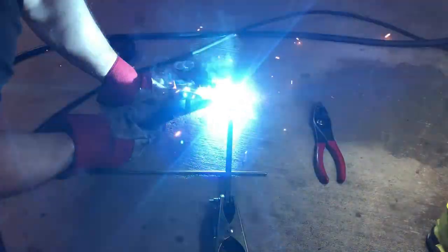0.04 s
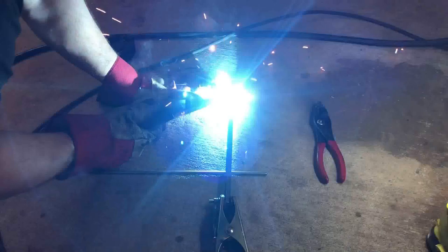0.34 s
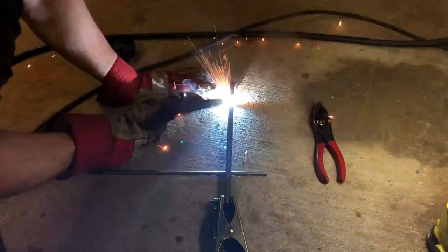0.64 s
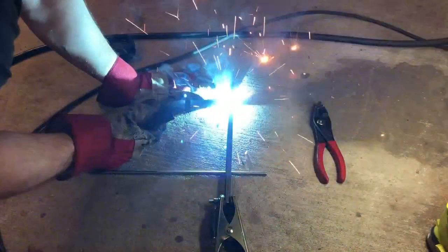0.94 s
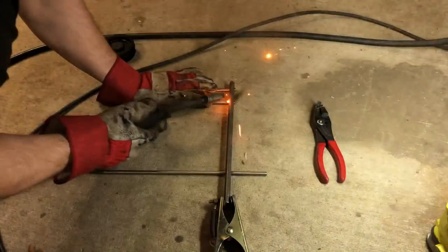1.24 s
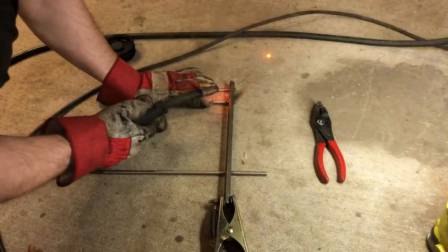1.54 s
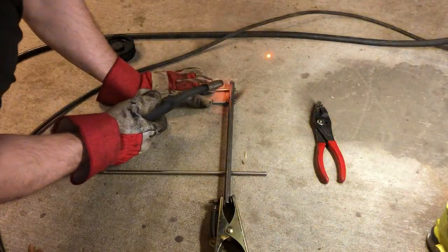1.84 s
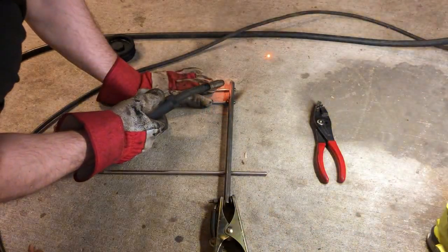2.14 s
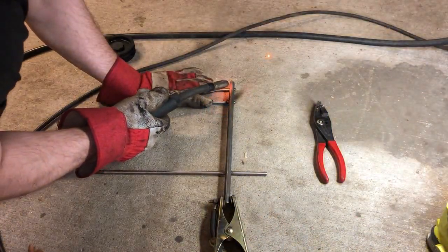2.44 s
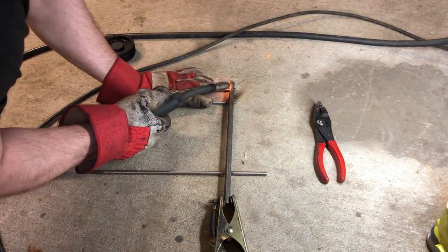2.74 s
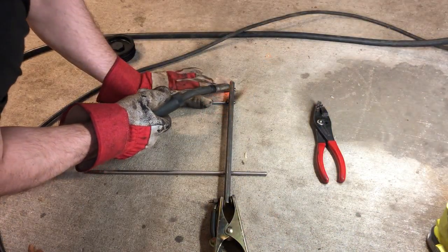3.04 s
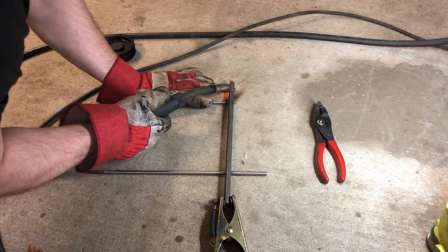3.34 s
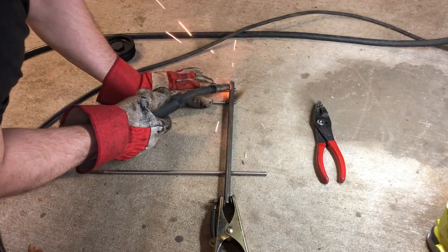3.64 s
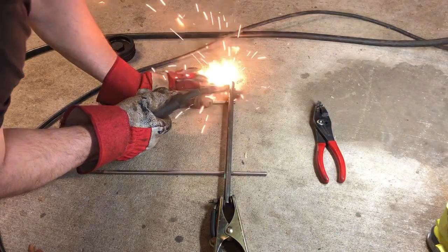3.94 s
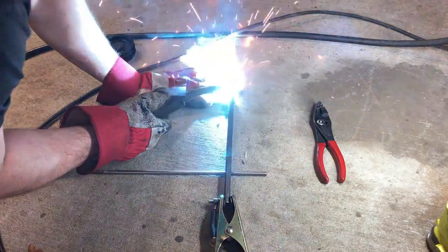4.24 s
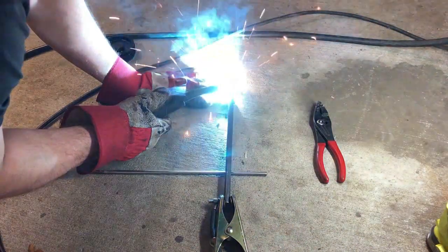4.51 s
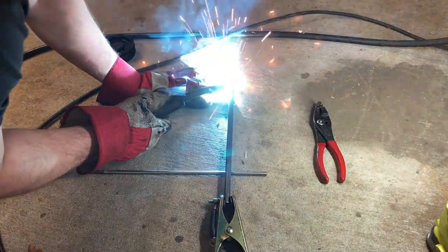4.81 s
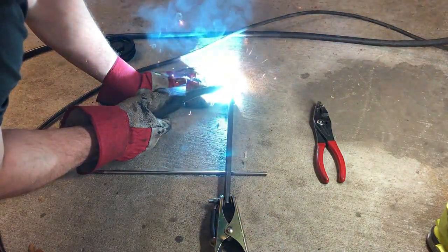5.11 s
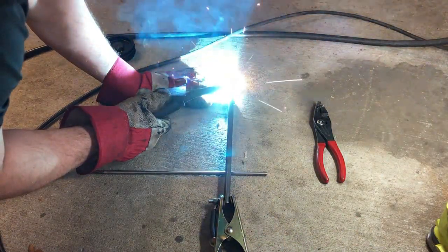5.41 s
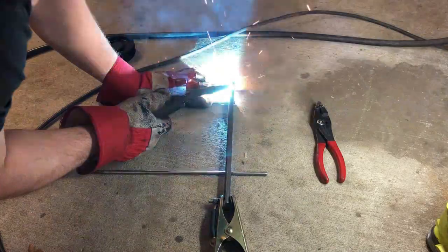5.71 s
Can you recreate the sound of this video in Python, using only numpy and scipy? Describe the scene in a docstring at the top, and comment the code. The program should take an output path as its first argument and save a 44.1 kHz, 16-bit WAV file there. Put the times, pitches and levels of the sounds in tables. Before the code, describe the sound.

A wire-feed arc welder is working on steel rods close to the microphone in a concrete-floored shop. From the start it gives sharp pops, quick crackling runs and fizzing sputter, each with a short room echo, stopping at about 1 second. Shielding gas hisses on softly with a slight high whistle until a valve shuts with a small knock at about 2.2 seconds. The welder's faint fan hum and thin electronic whine, present throughout, are left alone, with a very soft glove rub near 3 seconds. At 3.5 seconds the valve opens with a click and a puff, and the hiss returns. Scattered pops begin at 3.6 seconds, grow loud around 3.9, and from about 4.3 become a dense, uneven crackle lasting until nearly 6 seconds. The loudest pops slightly overload the microphone with a low thump.

```python
"""Sharp pops and sputter come first: a wire-feed arc welder tacks steel rods on a concrete shop floor.
Each time the wire touches the metal (a short) and the arc relights, it pops; floor and shop echo it.
Shielding gas hisses on after this first weld until its valve shuts. A glove rubs, then the valve
opens for a second, longer weld. The welder's fan hums and its electronics whine throughout.
The loudest pops overload the nearby microphone."""
import sys
import numpy as np
from scipy import signal
from scipy.fft import rfft, irfft, next_fast_len
from scipy.io import wavfile
from scipy.ndimage import map_coordinates

SR = 44100
rng = np.random.default_rng(int(sys.argv[2]) if len(sys.argv) > 2 else 0)


def generate_wav(sig):
    """Save sig (samples, or channels by samples) to the path in sys.argv[1] as 16-bit PCM at SR."""
    pcm = np.round(np.clip(np.atleast_2d(sig).T, -1, 1) * 32767).astype(np.int16)
    wavfile.write(sys.argv[1], SR, pcm)


N = 258646
LEAD = SR // 10  # extra samples before time zero, cut off at the end
TIME = np.arange(-LEAD, N) / SR
FFT_SIZE = next_fast_len(N + 2 * SR)
HZ = np.fft.rfftfreq(FFT_SIZE, 1 / SR)

# Lone pops where the wire stubs. Each row: time in seconds, thud and crack in relative dB.
SINGLE_POPS = [(-0.03, -9, -13.5), (0.4576, -6, -16.5), (0.7024, -13, -16), (3.6004, -13.5, -15.5),
               (3.6407, -18.5, -39), (3.7052, -26.5, -39), (3.8622, -12, -17), (3.9009, -7, -10),
               (4.0112, -6, -25.5), (4.031, -12.5, -11.5), (4.08, -21, -38), (4.188, -7.5, -23),
               (4.2124, -7, -9), (4.465, -14, -21), (4.7265, -15, -23), (4.7481, -8, -22),
               (4.7551, -10, -8.5), (4.7815, -11.5, -13), (4.8189, -8, -10.5), (4.8525, -13.5, -26),
               (5.2687, -10.5, -30), (5.3444, -10.5, -13), (5.4647, -11.5, -16), (5.5889, -14.5, -33)]
# Even runs of pops while the wire feeds steadily. Each row: first and last time in seconds,
# number of pops, thud and crack in relative dB, the thud's fall over the run in dB.
POP_RUNS = [(0.2068, 0.3092, 5, -9, -13, -2), (0.8381, 0.8786, 3, -6.5, -17, 1),
            (.892, 0.9441, 9, -11.5, -21, -1), (4.3278, 4.4258, 6, -8.5, -14, -1),
            (4.4825, 4.649, 10, -9.5, -16.5, 2), (4.8795, 5.0093, 5, -11.5, -16, -1.5),
            (5.044, 5.2425, 7, -14, -22.5, 0), (5.276, 5.5076, 8, -13.5, -22.5, 0),
            (5.634, 5.8423, 6, -12, -21, 6.5)]
# Ringing around the work. Each row: pitch in Hz, width in Hz, strength in dB.
RESONANCES = [(1054, 40, -2.5), (1296, 99, -3.5), (2297, 75, -4.5), (2404, 80, -12), (2730, 34, -18.5),
              (3160, 60, -5), (3427, 38, -4), (5300, 90, -22)]
# The wire burns back with no clean pop. Each row: start and length in seconds, level in dB.
SPITS = [(0.661, 0.018, -26.5), (0.679, 0.015, -18), (0.801, 0.029, -33.5), (0.891, 0.044, -24),
         (1.041, 0.023, -42.5), (3.993, 0.015, -20), (4.16, 0.012, -25), (4.313, 0.012, -26)]
# The gas jet as the torch moves. Each row: time in seconds, whistle in Hz, low rush in relative dB.
TORCH_PATH = [(1.15, 6000, -50), (1.266, 6150, -49), (1.48, 6020, -54.5), (1.59, 6050, -46),
              (1.96, 6070, -47), (2.2, 5800, -46.5)]
# The gas valve shuts, then opens. Each row: time in seconds, knock in dB, puff in dB.
VALVE_MOVES = [(2.185, -41.5, -61), (3.497, -42, -34.5)]
# Fan and transformer tones. Each row: pitch in Hz, level in dB.
HUM_TONES = [(269.2, -69), (473.7, -65), (538.3, -59.5), (882.9, -66), (1346, -59.5), (1615, -71),
             (1884, -76), (2153, -68)]
# Echoes off nearby surfaces. Each row: delay in seconds, gain, frequency in Hz below which it fades.
NEAR_ECHOES = [(.00064, -0.46, 2500), (.00134, -0.29, 3000), (.00229, 0.53, 1237), (.00401, 0.54, 1393),
               (.00464, -.55, 2500), (0.0137, 0.11, 512)]
# How long the shop rings. Each row: frequency in Hz, seconds to fade by 60 dB (called t60).
SHOP_FADE = [(150, 0.48), (1000, 0.74), (3000, 0.55), (7000, 0.58), (14000, 0.34)]

# The tone colour of each sound. Each row: frequency in Hz, relative level in dB.
POP_COLOUR = [(30, -35), (90, -24), (130, -24), (185, -17), (310, -22), (470, -10.5), (750, -5.5),
              (1000, -4.5), (1280, -1.5), (1500, -8), (2000, -8), (2600, -4), (3500, -10), (4900, -16),
              (6300, -10), (8500, -12.5), (16000, -39)]
DROPLET_COLOUR = [(200, -30.5), (1000, 1.5), (2500, 4), (4500, -8), (7800, 3.5), (10000, -13.5),
                  (16000, -20.5)]
HISS_COLOUR = [(600, -24.5), (1300, -22), (3000, -19), (4800, -17), (5500, -6), (6500, -5), (7500, -12),
               (8600, -17), (10000, -14.5), (12000, -34.5), (14900, -35.5), (16000, -50.5)]
RUSH_COLOUR = [(300, -31), (900, -14.5), (1250, -2.5), (1500, -11), (1800, -1), (2200, -2), (3000, -18.5),
               (6000, -34)]
KNOCK_COLOUR = [(60, -14), (250, -7), (550, 4.5), (1300, 3), (3000, -8), (16000, -48.5)]
PUFF_COLOUR = [(200, -22), (1200, -8), (2200, 9.5), (3100, 0), (3600, 4), (4300, -13), (6000, -4),
               (9000, -11.5), (16000, -33)]
GLOVE_COLOUR = [(300, -25), (1500, -16.5), (2250, 9), (3000, -15), (10000, -32)]
FAN_COLOUR = [(15, -53), (25, -26), (49, -8), (236, -11.5), (270, -3.5), (373, -10), (405, -9), (531, -4.5),
              (695, -10.5), (863, -2), (1160, -5.5), (1330, -4), (1700, -17.5), (2220, -12.5), (16000, -44)]
SHOP_COLOUR = [(100, -2), (500, -2.5), (800, -4.5), (1150, -2), (1600, -0.5), (2400, -1.5), (4200, 6),
               (8000, -1.5), (15000, 5)]


def wire_shorts(jitter_s=0.0007, scatter_db=0.5, crack_growth=1.98, tick_lead_s=0.0055, tick_db=-25.5):
    """The wire ticks on the melted metal, then the arc pops. Each row: seconds, thud dB, crack dB."""
    rows = [np.array(SINGLE_POPS)]
    for first, last, count, thud, crack, fall in POP_RUNS:
        progress = np.linspace(0, 1, round(count))
        late, strong = rng.standard_normal((len(progress), 2)).T
        late[[0, -1]] = 0
        times = first + (last - first) * progress + jitter_s * late
        swing_db = scatter_db * strong + fall * (0.5 - progress)
        # stronger pops are more abrupt, so the crack grows faster than the thud
        rows.append(np.column_stack([times, thud + swing_db, crack + crack_growth * swing_db]))
    relights = np.vstack(rows)
    ticks = relights + [-tick_lead_s, tick_db, tick_db]
    return np.vstack([relights, ticks])


def arc_pops(events, split_hz=2600, boost_db=21, spray_db=-2.5, spray_t60=0.0108):
    """The relighting arc gives the air one push: abrupt ones crack and spray metal, slow ones thud."""
    times, thud_db, crack_db = events.T
    starts = np.round(times * SR).astype(int) + LEAD
    age = np.arange(SR // 50)
    spray = rng.standard_normal((len(times), len(age))) * amp(-60 * age / SR / spray_t60)
    bursts = (age == 0) + amp(spray_db) * spray / np.linalg.norm(spray, axis=1, keepdims=True)
    bursts *= amp(crack_db + boost_db)[:, None]
    thuds = np.bincount(starts, amp(thud_db + boost_db), len(TIME))  # adds each at its start
    cracks = np.bincount((starts[:, None] + age).ravel(), bursts.ravel())
    ring = sum(amp(db) / (1 + (2 * (HZ - hz) / width) ** 2) for hz, width, db in RESONANCES)
    colour = causal(amp(along(POP_COLOUR, HZ)) * (1 + ring))
    lows = 1 / (1 + (HZ / split_hz) ** 4)
    return filtered(thuds, unit(colour * lows)) + filtered(cracks, unit(colour * (1 - lows)))


def sputter(events, drops_per_s=5000, spread_db=3, shower_db=-17.5, shower_t60=0.11):
    """Tiny droplets burst: a shower dies away after every pop, and longer spits swell and fade."""
    times, _, crack_db = events.T
    starts = np.round(times * SR).astype(int) + LEAD
    thrown = np.bincount(starts, amp(crack_db + shower_db), len(TIME))
    showers = signal.lfilter([1], [1, -amp(-60 / (shower_t60 * SR))], thrown)
    spits = sum(amp(db) * np.sqrt(np.maximum(1 - (2 * (TIME - start) / length - 1) ** 2, 0))
                for start, length, db in SPITS)
    bursting = rng.random(len(TIME)) < drops_per_s / SR
    droplets = bursting * rng.standard_normal(len(TIME)) * amp(spread_db * wobble(400))
    return (showers + spits) * unit(filtered(droplets, amp(along(DROPLET_COLOUR, HZ))))


def gas(off_s=2.204, on_s=3.499, close_t60=0.33, build_s=0.033, whistle_width_hz=170, flutter_db=1.8):
    """Gas hisses from the nozzle while the valve is open; its colour shifts as the torch moves."""
    times, nozzle_hz, rush_db = np.transpose(TORCH_PATH)
    first_flow = amp(-60 * np.maximum(TIME - off_s, 0) / close_t60)
    second_flow = amp(2) * (1 - np.exp(-np.maximum(TIME - on_s, 0) / build_s))
    slow_noise = filtered(rng.standard_normal(len(TIME)), 1 / (1 + (HZ / whistle_width_hz) ** 2))
    phase = 2 * np.pi * np.cumsum(np.interp(TIME, times, nozzle_hz)) / SR
    whistle = unit(slow_noise * np.sin(phase))
    hiss = noise(HISS_COLOUR)
    # the floor's echo comes earlier or later as the hand sways, so the hiss swishes
    delay_s = 0.00111 * (1 + 0.07 * wobble(3))
    hiss = unit(hiss + 0.22 * np.interp(TIME - delay_s, TIME, hiss))
    layers = [(-49, hiss), (-55, whistle), (np.interp(TIME, times, rush_db), noise(RUSH_COLOUR))]
    jet = sum(amp(db + flutter_db * wobble(7.02)) * sound for db, sound in layers)
    return (first_flow + second_flow) * jet


def valve(knock_t60=0.48, puff_t60=0.27):
    """The magnet-driven valve knocks in the welder's case and gas puffs from the torch."""
    knocks = sum(amp(db) * dying(start, knock_t60) for start, db, _ in VALVE_MOVES)
    puffs = sum(amp(db) * dying(start, puff_t60) for start, _, db in VALVE_MOVES)
    return knocks * noise(KNOCK_COLOUR) + puffs * noise(PUFF_COLOUR)


def glove(peak_s=3.075, width_s=0.04, level_db=-56):
    """A glove rubs softly as the torch is moved to the next joint."""
    return amp(level_db) * np.exp(-((TIME - peak_s) / width_s) ** 2) * noise(GLOVE_COLOUR)


def fan(air_db=-51, waver_db=2, phase_drift=0.35):
    """Cooling air rushes while the fan and transformer hum a little unsteadily."""
    tones = sum(amp(db - waver_db * wobble(3.2))
                * np.sin(2 * np.pi * hz * TIME + phase_drift * wobble(8.6)) for hz, db in HUM_TONES)
    return amp(air_db) * noise(FAN_COLOUR) + np.sqrt(2) * tones


def whine(pitch_hz=5060, jitter_hz=25, level_db=-74, overtone_db=-15):
    """The welder's power electronics sing faintly, never quite on one pitch."""
    phase = 2 * np.pi * np.cumsum(pitch_hz + jitter_hz * wobble(119.5)) / SR
    return amp(level_db) * (np.sin(phase) + amp(overtone_db) * np.sin(3 * phase))


def with_near_echoes(sound, scatter_db=-7, scatter_t60=0.035, scatter_hz=2500):
    """The floor and the welder's case add clear echoes; gloves and tools scatter the treble."""
    age = np.arange(SR // 20) / SR
    scatter = rng.standard_normal(len(age)) * amp(-60 * age / scatter_t60)
    scatter = rfft(scatter / np.linalg.norm(scatter), FFT_SIZE) * HZ / np.hypot(HZ, scatter_hz)
    echoes = sum(gain * HZ / np.hypot(HZ, low_hz) * np.exp(-2j * np.pi * HZ * delay)
                 for delay, gain, low_hz in NEAR_ECHOES)
    return filtered(sound, 1 + echoes + amp(scatter_db) * scatter)


def shop_reverb(sound, rise_s=0.0054, early_db=3, early_t60=0.13):
    """Sound bounces around the shop: strong first echoes, then a tail whose treble dies soonest."""
    hz, times, bands = signal.stft(rng.standard_normal(SR), SR, nperseg=256)
    fade = amp(-60 * times / along(SHOP_FADE, hz)[:, None])
    tail = signal.istft(bands * fade, SR, nperseg=256)[1]
    age = np.arange(len(tail)) / SR
    tail *= 1 - np.exp(-(age / rise_s) ** 2)
    tail *= 1 + amp(early_db - 60 * age / early_t60)
    return filtered(sound, rfft(tail / np.linalg.norm(tail), FFT_SIZE) * amp(along(SHOP_COLOUR, HZ)))


def amp(db):
    """Turn decibels into a gain to multiply by."""
    return 10 ** (np.asarray(db) / 20)


def unit(x):
    """Scale to an average power of 1."""
    return x / np.sqrt(np.mean(np.abs(x) ** 2) + 1e-20)


def along(table, hz):
    """Read between a table's rows on a log frequency scale."""
    row_hz, values = np.transpose(table)
    return np.interp(np.log(hz + 1), np.log(row_hz), values)


def filtered(sound, response):
    """Filter a sound, given one gain for each frequency in HZ."""
    return irfft(rfft(sound, FFT_SIZE) * response, FFT_SIZE)[:len(TIME)]


def causal(gain):
    """A filter with these gains that rings only after it is struck."""
    cepstrum = irfft(np.log(np.maximum(gain, 1e-6)), FFT_SIZE)
    cepstrum[1:FFT_SIZE // 2] *= 2
    cepstrum[FFT_SIZE // 2 + 1:] = 0
    return np.exp(rfft(cepstrum))


def noise(colour):
    """Noise with this tone colour and an average power of 1."""
    return unit(filtered(rng.standard_normal(len(TIME)), amp(along(colour, HZ))))


def wobble(rate):
    """A smooth curve through `rate` random values a second."""
    position = np.arange(len(TIME)) * rate / SR
    return map_coordinates(rng.standard_normal(int(position[-1]) + 4), [position])


def dying(start, t60):
    """A level that jumps up at start and fades."""
    return (TIME >= start) * amp(-60 * np.maximum(TIME - start, 0) / t60)


def scene(reverb_db=-3.5):
    """The arc echoes in the shop, over the gas, the machine and the glove."""
    events = wire_shorts()
    arc = arc_pops(events) + sputter(events)
    machine = gas() + valve() + fan() + whine()
    mix = with_near_echoes(arc) + amp(reverb_db) * shop_reverb(arc) + machine + glove()
    return mix[None, LEAD:]


def record(dry, lag_cycles=0.8, lag_hz=250, overload_at=0.94, thump_db=-8.5, thump_hz=220, top_hz=16000):
    """The microphone passes bass later than treble, so pops sweep downward; the loudest ones clip."""
    lag = np.exp(-2j * np.pi * lag_cycles * np.log(1 + HZ / lag_hz))
    heard = irfft(rfft(dry, FFT_SIZE) * lag, FFT_SIZE)
    # the overload is lopsided, which puts a low thump under the loudest pops
    overload = np.clip(np.abs(heard) - overload_at, 0, 1)
    bass_only = HZ / (HZ - 20j) / (1 + 1j * HZ / thump_hz) ** 2
    thump = irfft(rfft(overload, FFT_SIZE) * bass_only, FFT_SIZE)
    clipped = np.clip(heard + amp(thump_db) * thump, -1, 1)
    return irfft(rfft(clipped) / (1 + (HZ / top_hz) ** 120), FFT_SIZE)[:, :N]


dry = scene()
out = record(dry)
generate_wav(out)
```